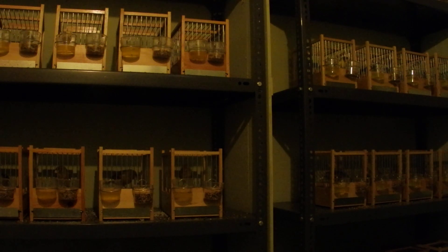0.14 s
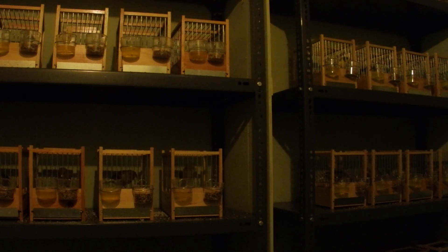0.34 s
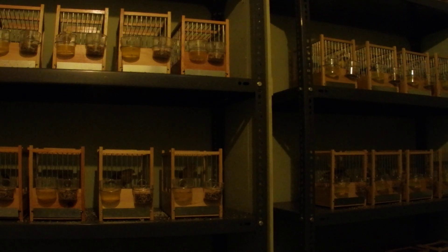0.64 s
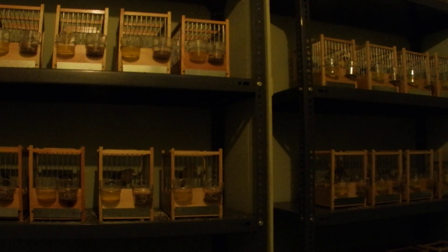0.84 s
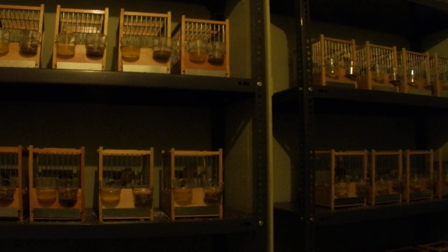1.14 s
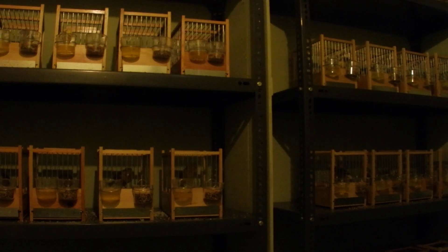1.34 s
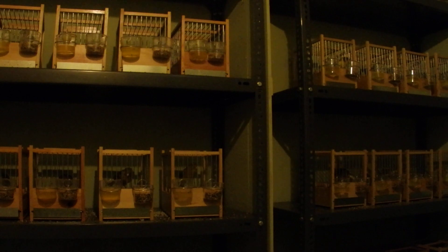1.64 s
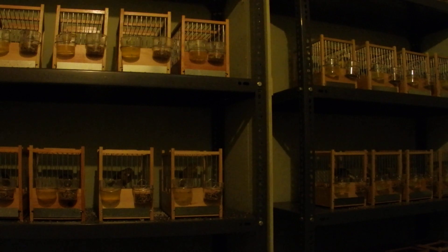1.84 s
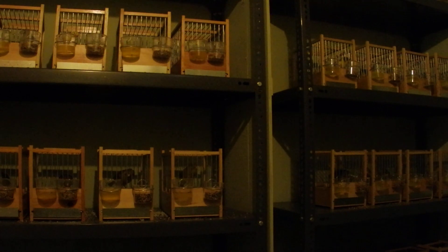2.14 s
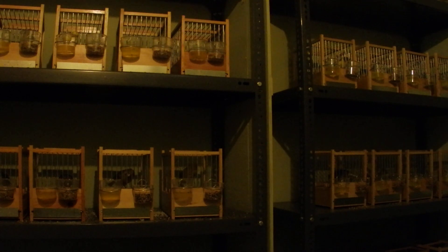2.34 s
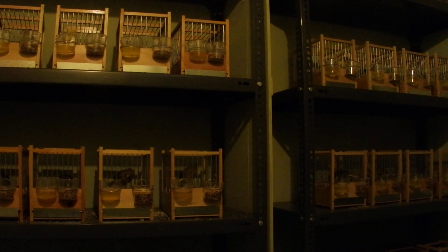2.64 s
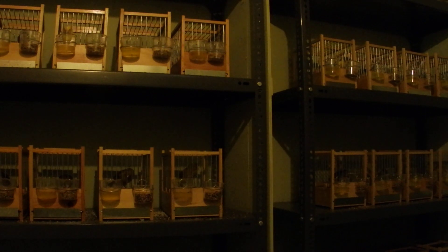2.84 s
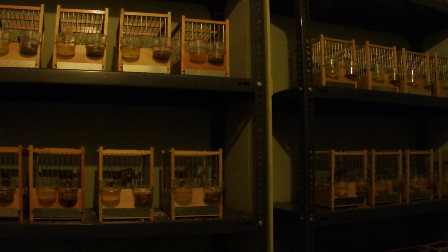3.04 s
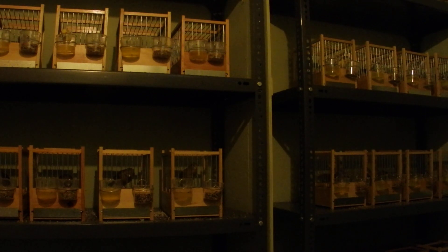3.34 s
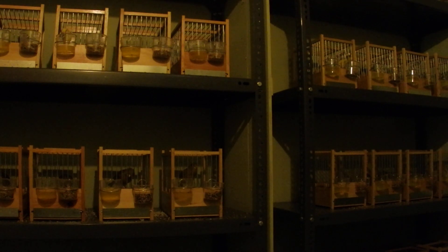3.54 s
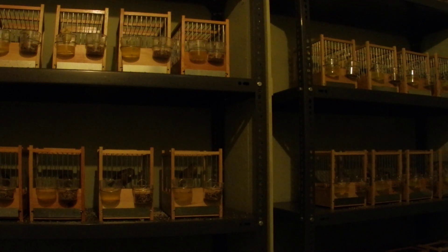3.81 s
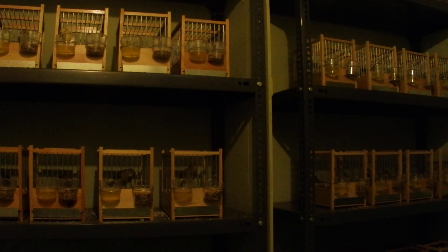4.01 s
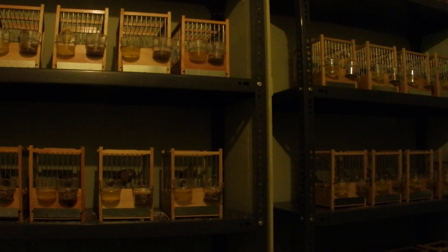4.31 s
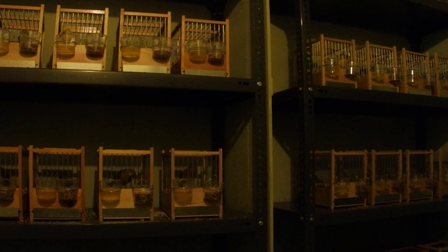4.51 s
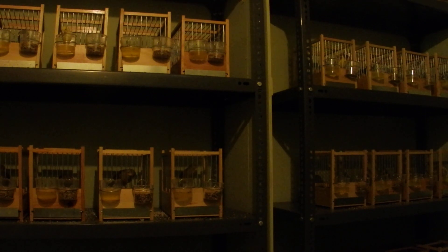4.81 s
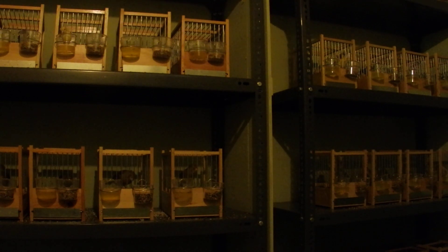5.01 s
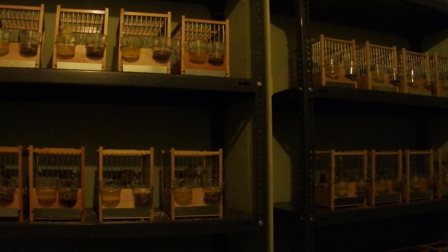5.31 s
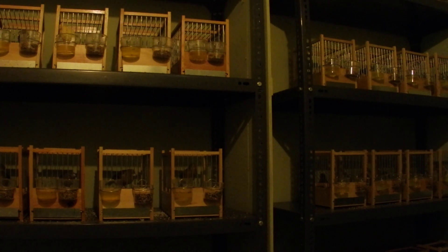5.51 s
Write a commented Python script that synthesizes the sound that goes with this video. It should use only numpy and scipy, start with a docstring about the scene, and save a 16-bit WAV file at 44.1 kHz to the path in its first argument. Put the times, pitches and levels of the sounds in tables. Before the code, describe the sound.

Several canaries sing at once from small cages in a hard-walled room. Chirps and a fast trill come first, then held whistles and sliding notes, then sharp high calls and louder overlapping trills near the end. Farther birds twitter behind, with a few faint ticks on the cages and a low, airy room hum. The notes ring briefly off the walls.

```python
"""A hard-walled bird room, where canaries sing over one another from rows of small cages.
Each syllable is a nearly pure whistle: the syrinx glides and the throat lets out only faint overtones.
Held notes, slurs, chirps and fast trills smear into ringing tails off the walls. Farther birds twitter
behind, feet and beaks tick on the cages, and the building's rumble and an airy wash lie underneath."""
import sys
import numpy as np
from scipy import signal
from scipy.fft import rfft, irfft
from scipy.io import wavfile

SR = 44100
rng = np.random.default_rng(int(sys.argv[2]) if len(sys.argv) > 2 else 0)


def master(y):
    """Save y as 16-bit WAV."""
    cut = np.clip(np.atleast_2d(y).T, -1, 1)
    pcm = np.round(cut * 32767)  # scale
    wavfile.write(sys.argv[1], SR, pcm.astype(np.int16))


N = 249606

# overtone strength against the fundamental, by where it lands: frequency_hz, level_db
OVERTONES = [(5500, -25), (7000, -32.5), (7900, -45), (9600, -41.5), (11500, -35), (14000, -34.5),
             (16000, -46.5)]
# ring time of the room: frequency_hz, t60_s
ROOM_T60 = [(500, 0.054), (2000, 0.74), (3500, 0.49), (5500, 0.37), (9000, 0.24), (15000, 0.19)]
# tone of the two noise beds: frequency_hz, level_db
RUMBLE_COLOUR = [(20, -11), (60, -7), (170, -2), (300, -6.5), (600, -9), (1100, -1.5), (2000, -40),
                 (5000, -32.5)]
WASH_COLOUR = [(600, -7), (1050, -4), (1400, 4.5), (3500, 7.5), (5000, 0), (7500, -19.5), (14000, -23.5),
               (16000, -26.5)]
# fader rides for the beds and the far chorus: time_s, level_db
RUMBLE_RIDE = [(0, -64), (.4, -54), (1, -59), (2.3, -57.5), (2.7, -63.5), (3.25, -59.5), (4, -60.5),
               (4.2, -64.5), (5.66, -64.5)]
WASH_RIDE = [(0, -44), (.6, -53), (1.6, -49), (2.2, -57), (3.3, -49.5), (4.3, -52), (5.66, -51)]
CHORUS_RIDE = [(0, -33.5), (.5, -39.5), (1, -39), (1.5, -53), (2.1, -69), (2.7, -40), (4, -35.5),
               (5.66, -43)]
# soft low notes from the back shelves: start_s, length_s, pitch_hz, level_db
COOS = [(0.048, 0.054, 1792, -38.5), (2.126, 0.054, 1952, -48.5), (2.374, .016, 1765, -40.5),
        (2.781, 0.065, 1925, -44.5), (2.861, 0.021, 1690, -39.5), (3.03, 0.046, 2153, -41),
        (3.161, .013, 1717, -35), (3.207, .021, 2220, -33.5), (4.961, 0.031, 1870, -41),
        (5.191, 0.11, 1900, -41.5), (5.29, 0.029, 1898, -34), (5.576, 0.073, 1865, -34.5)]
# rising chirps: start_s, length_s, start_pitch_hz, level_db
CHIRPS = [(.132, 0.0167, 3030, -22.5), (.26, 0.0092, 3880, -28.5), (.418, .017, 2525, -25.5),
          (.49, 0.041, 2382, -29.5), (1.9, 0.01, 3640, -27.5), (2.30, 0.011, 3770, -26),
          (2.937, 0.017, 2900, -24.5), (3.075, 0.033, 3500, -25.5), (3.238, 0.0138, 3536, -25),
          (3.752, 0.015, 3770, -32.5), (3.992, 0.016, 2793, -24.5), (4.026, 0.0091, 3760, -23.5)]
# whip-like "tsip" calls: start_s, top_pitch_hz, level_db
WHIPS = [(0.2591, 5514, -21.5), (1.506, 6980, -20.5), (1.546, 5300, -27), (1.854, 6970, -20),
         (3.833, 6440, -19), (4.031, 5910, -15.5), (4.231, 5710, -14.5), (4.427, 5980, -14.5),
         (4.614, 5900, -17.5), (4.81, 5820, -17.5), (5.057, 6130, -20.5), (5.431, 6590, -27)]
# the three steps of a "chop": delay_s, length_s, pitch_ratio, offset_db
CHOP_STEPS = [(0, .018, 1, -1), (.021, .011, .77, 0.5), (0.033, .011, .47, -10)]
# held notes: start_s, length_s, pitch_hz, glide_share, level_db
WHISTLES = [(0.488, 0.02, 5170, 0.06, -30.5), (0.6, 0.069, 4050, -.08, -28),
            (0.813, 0.052, 4060, -0.01, -26), (1.068, 0.058, 3738, 0.018, -27),
            (1.18, .055, 3900, -0.12, -30), (1.246, 0.042, 2994, -0.087, -23),
            (1.311, 0.077, 2850, -0.059, -22), (1.41, 0.047, 2787, -0.052, -26.5),
            (1.647, .1, 2790, 0.009, -21.5), (1.668, 0.25, 3700, 0.035, -31.5),
            (1.911, 0.2, 3672, -0.052, -29), (1.983, .11, 2798, 0.012, -22),
            (2.10, 0.085, 2860, -0.011, -28.5), (2.146, 0.1, 3553, 0.027, -28.5),
            (2.272, 0.079, 3790, -0.0099, -22.5), (2.389, .07, 3790, -0.0025, -30),
            (2.331, 0.099, 4790, -0.0154, -21), (2.645, 0.077, 4804, 0.0015, -19.5),
            (2.821, 0.1, 6795, -0.0064, -45.5), (2.913, 0.036, 2582, 0.044, -32),
            (2.953, .13, 3963, 0.034, -21.5), (3.205, 0.013, 3015, 0.045, -29),
            (3.416, 0.087, 2723, -0.077, -31), (3.707, 0.04, 3870, 0.063, -23),
            (3.963, 0.039, 6840, -0.03, -42.5)]
# feet and beaks on the cages: start_s, level_db
TICKS = [(.67, -42), (1.71, -37), (2.029, -39), (2.097, -41), (2.388, -44), (3.335, -42), (4.619, -39),
         (5.104, -44)]
# slow falling slurs: start_s, length_s, top_pitch_hz, level_db
SLURS = [(1.457, 0.044, 4555, -33), (1.518, 0.072, 3668, -29), (2.763, 0.076, 3896, -37),
         (4.773, 0.045, 3960, -34.5)]
# "tsee-oo" calls: break_s, whistle_length_s, whistle_pitch_hz, whistle_db, tumble_db
TUMBLES = [(2.31, 0.055, 6736, -41.5, -32), (2.501, 0.032, 5850, -34.5, -21),
           (2.624, .065, 6610, -43.5, -28.5), (3.132, 0.014, 5710, -32.5, -33),
           (3.305, 0.047, 6060, -30, -21), (3.58, 0.042, 5900, -29.5, -20.5)]

# Each trill has a BEAT, its rhythm: first_s, gap_s, count, optional slowing_s
# and, where it drifts, a COURSE: time_s, pitch_hz, level_db
FAR_BEAT, FAR_COURSE = dict(first_s=.033, gap_s=.1075, count=6), [(.03, 3423, -34), (.25, 3532, -28.5), (.57, 3515, -24)]
TWIT_BEATS, CHOP_BEATS = [dict(first_s=.065, gap_s=.106, count=4), dict(first_s=.66, gap_s=.206, count=4),
                          dict(first_s=3.965, gap_s=.21, count=2)], [dict(first_s=.3, gap_s=.042, count=3),
                                              dict(first_s=.472, gap_s=.211, count=7),
                                              dict(first_s=2.86, gap_s=.27, count=2),
                                              dict(first_s=3.68, gap_s=.102, count=13)]  # several runs each
HOOK_BEAT, HOOK_COURSE = dict(first_s=.505, gap_s=.0535, slowing_s=.00031, count=13), [(0.501, 3234, -25.5), (.6, 3395, -24.5), (0.799, 3270, -24),
                                             (1.2, 3240, -23.5)]
HOARSE_BEAT, HOARSE_COURSE = dict(first_s=.54, gap_s=.107, count=7), [(.54, 2914, -27), (.75, 2836, -33), (0.971, 2880, -28),
                                                  (1.18, 2843, -34)]
WARBLE_BEAT, WARBLE_COURSE = dict(first_s=3.715, gap_s=.106, count=7), [(3.71, 2640, -33), (3.9, 2551, -28.5), (4.14, 2476, -34),
                                                   (4.35, 2514, -33)]
BELL_BEAT, BELL_COURSE = dict(first_s=4.439, gap_s=.1036, count=12), [(4.44, 4628, -18.5), (4.75, 4660, -20), (5.271, 4720, -20.5),
                                             (5.58, 4857, -27.5)]
FLICK_BEAT, FLICK_COURSE = dict(first_s=4.535, gap_s=.1365, count=8), [(4.53, 3303, -37.5), (4.82, 3452, -34), (5.5, 3395, -32.5)]
PIP_BEAT, PIP_COURSE = dict(first_s=4.573, gap_s=.1042, count=11), [(4.57, 3747, -26), (4.9, 3715, -19.5), (5.2, 3720, -21.5),
                                          (5.42, 3822, -16), (5.61, 3940, -19.5)]
SLUR_BEAT, SLUR_COURSE = dict(first_s=4.92, gap_s=.203, count=4), [(4.9, 3510, -36), (5.53, 3610, -35.5)]
THIN_BEAT, THIN_COURSE = dict(first_s=5.16, gap_s=.197, count=3), [(5.16, 6890, -50), (5.359, 6850, -46), (5.56, 6900, -49.5)]

TOP_HZ = 15850


def amp(db):
    """Decibels to gain."""
    return 10 ** (np.asarray(db) / 20)


def curve_at(points, hz):
    """Reads a curve on a log-frequency axis."""
    frequency, value = np.transpose(points)
    return np.interp(np.log(hz + 1), np.log(frequency + 1), value)


def ride_db(ride, t):
    """Fader level at time t."""
    return np.interp(t, *np.transpose(ride))


def add(mix, s, sound):
    """Mixes a sound in at time s."""
    part = mix[max(round(s * SR), 0):][:len(sound)]
    part += sound[:len(part)]


def noise(colour, size):
    """Coloured noise of rms 1."""
    gain = amp(curve_at(colour, np.fft.rfftfreq(size, 1 / SR)))
    shaped = irfft(rfft(rng.standard_normal(size)) * gain, size)
    return shaped / np.sqrt(np.mean(shaped ** 2) + 1e-20)


def waver(t, rate_hz):
    """Smooth random wobble of rms about 1, no faster than rate_hz."""
    hz = np.geomspace(rate_hz / 10, rate_hz, num=8)[:, None]
    return np.sin(2 * np.pi * (hz * t + rng.random(hz.shape))).sum(0) / 2


def room(dry, wet_db, slaps=10):
    """Direct sound, slaps off the nearest shelves, then a grainy tail that rings longest near 2 kHz."""
    taps = rng.standard_normal(SR) * (rng.random(SR) < .03) * (np.arange(SR) / SR > .004)
    taps[(rng.uniform(.002, .035, slaps) * SR).astype(int)] += 1.8 * rng.choice([-1, 1], slaps)
    hz, t, spectrum = signal.stft(taps, SR, nperseg=256)
    decay = amp(-60 * t / curve_at(ROOM_T60, hz)[:, None])
    tail = signal.istft(spectrum * decay, SR, nperseg=256)[1]
    return dry + amp(wet_db) * signal.fftconvolve(dry, tail / np.linalg.norm(tail))[:N]


def syllable(length, start_hz, middle_hz, end_hz, db, rough, fade, bright_db):
    """The syrinx glides through three pitches; rough is pitch jitter, fade the share spent fading."""
    t = np.arange(int(max(length, .004) * SR)) / SR
    u = t / t[-1]
    arc = start_hz * (1 - u) * (1 - 2 * u) + middle_hz * 4 * u * (1 - u) + end_hz * u * (2 * u - 1)
    hz = arc * (1 + rough * waver(t, 351.7))
    phase = 2 * np.pi * np.cumsum(hz) / SR
    overtones = sum(amp(curve_at(OVERTONES, k * hz)) * (k * hz < TOP_HZ) * np.sin(k * phase)
                    for k in range(2, 5))
    swell = signal.windows.tukey(len(t), np.clip(fade, .1, 1)) * amp(db + 1.2 * waver(t, 91.2))
    rasp = .52 * rough * np.diff(rng.standard_normal(len(t) + 1))  # hoarse notes carry bright air
    return swell * (np.sin(phase) + amp(bright_db) * (overtones + rasp))


def song(rows, rough, fade, bright_db=0):
    """A run of syllables, each with its own contour; a wider beak (bright_db) frees more overtones."""
    out = np.zeros(N)
    for s, *shape in rows:
        add(out, s, syllable(*shape, rough, fade, bright_db))
    return out


def trill(rows, length, start, end, rough, fade, lag=0, bright_db=0):
    """One syllable shape repeated; start and end are ratios to each row's pitch."""
    notes = [(s + lag, length, hz * start, hz, hz * end, db) for s, hz, db in rows]
    return song(notes, rough, fade, bright_db)


def fall(rows, length, middle, end, rough, fade):
    """Steep downward sweeps; middle and end are ratios to the top pitch."""
    return song([(s, length, hz, hz * middle, hz * end, db) for s, hz, db in rows], rough, fade)


def beats(first_s, gap_s, count, slowing_s=0):
    """Start times of repeated syllables; a tiring bird slows a little."""
    k = np.arange(count)
    return first_s + gap_s * k + slowing_s * k ** 2


def repeats(beat, course, stray_share=.0041, stray_db=1):
    """A trill's rows (start_s, pitch_hz, level_db), each straying slightly from the course."""
    starts = beats(**beat)
    times, hz, db = np.transpose(course)
    pitch_stray, level_stray = rng.standard_normal((len(starts), 2)).T
    pitches = np.interp(starts, times, hz) * (1 + stray_share * pitch_stray)
    levels = np.interp(starts, times, db) + stray_db * level_stray
    return list(zip(starts, pitches, levels))


def room_tone():
    """The building's unsteady rumble under a diffuse, airy wash."""
    t = np.arange(N) / SR
    rumble = noise(RUMBLE_COLOUR, N) * amp(ride_db(RUMBLE_RIDE, t) + 3.48 * waver(t, 12))
    wash = noise(WASH_COLOUR, N) * amp(ride_db(WASH_RIDE, t))
    return rumble + wash


def far_twitter(count=260, twit_hz=5360, twit_db=-39.5):
    """The farthest birds, nearly all reverb: thin twits over a chorus of short, mostly falling glides."""
    twit_rows = [(s, twit_hz, twit_db) for beat in TWIT_BEATS for s in beats(**beat)]
    twits = trill(twit_rows, length=.018, start=.93, end=.61, rough=.039, fade=.59)
    rows = []
    for k, (when, stretch, pitch, spread, slope) in enumerate(rng.random((count, 5))):
        s = (k + when) / count * N / SR
        length = .0155 + .0297 * stretch
        hz = 2000 + 1600 * (pitch + spread)  # two draws crowd the middle of the range
        glide = .2534 * slope - .08
        rows.append((s, length, hz * (1 + glide), hz, hz * (1 - glide), ride_db(CHORUS_RIDE, s)))
    chorus = song(rows, rough=.027, fade=.52, bright_db=-.5)
    return room(amp(-12.5) * (twits + chorus), wet_db=11)


def far_notes(pip_rows):
    """Heard mostly off the walls: an even trill, low coos and a falling afternote to each pip."""
    even_trill = trill(repeats(FAR_BEAT, FAR_COURSE),
                       length=.0442, start=1.01, end=.92, rough=.0082, fade=.17)
    coo_rows = [(s, length, hz * 1.01, hz, hz * .99, db) for s, length, hz, db in COOS]
    coos = song(coo_rows, rough=.0044, fade=.17)
    afternotes = trill([(s, .72 * hz, -34) for s, hz, _ in pip_rows],
                       length=.028, start=1.2, end=.9, rough=.02, fade=.8, lag=.021)
    return room(amp(-5) * (even_trill + coos + afternotes), wet_db=3.5)


def chirps(rise=.24, climbed_by_half=.576):
    """Bright, slightly hoarse upward sweeps that ease off towards the top."""
    rows = [(s, length, hz, hz * (1 + climbed_by_half * rise), hz * (1 + rise), db)
            for s, length, hz, db in CHIRPS]
    return room(song(rows, rough=.026, fade=.52, bright_db=3), wet_db=.5)


def whips():
    """A tiny lead-in note, then the pitch leaps up and whips down."""
    leads = trill([(s, .77 * hz, db - 8) for s, hz, db in WHIPS],
                  length=.006, start=.97, end=1, rough=.01, fade=1, lag=-.006)
    sweeps = fall(WHIPS, length=.0105, middle=.8, end=.71, rough=.02, fade=1)
    return room(amp(1) * (leads + sweeps), wet_db=-4.8)


def chops(base_hz=2450, base_db=-41):
    """Back-shelf notes that drop in three steps, no two alike, creeping sharper as the song goes on."""
    starts = np.concatenate([beats(**beat) for beat in CHOP_BEATS])
    strays = rng.standard_normal((len(starts), 2))
    rows = [(s, base_hz * (.9 + .025 * s + .045 * pitch_stray), base_db + 1.2 * level_stray)
            for s, (pitch_stray, level_stray) in zip(starts, strays)]
    out = np.zeros(N)
    for lag, length, ratio, offset_db in CHOP_STEPS:
        step_rows = [(s, hz * ratio, db + offset_db) for s, hz, db in rows]
        out += trill(step_rows, length, start=1.1, end=.85, rough=.013, fade=.52, lag=lag)
    return room(amp(-2) * out, wet_db=.8)


def whistles(sag=.0083):
    """Held notes that glide gently and sag in the middle."""
    rows = [(s, length, hz * (1 - glide / 2), hz * (1 - sag), hz * (1 + glide / 2), db)
            for s, length, hz, glide, db in WHISTLES]
    return room(song(rows, rough=.0073, fade=.25), wet_db=-1.5)


def hook_trill():
    """A fast run of notes that hook upward and level off."""
    hooks = trill(repeats(HOOK_BEAT, HOOK_COURSE),
                  length=.023, start=.9, end=.99, rough=.006, fade=.34, bright_db=4.5)
    return room(amp(-.05) * hooks, wet_db=.6)


def mingled_trills():
    """Hoarse chirps under the hooks; later, bright flicks with low afternotes and two strings of slurs."""
    hoarse = trill(repeats(HOARSE_BEAT, HOARSE_COURSE),
                   length=.0205, start=.92, end=1.064, rough=.015, fade=.26)
    flick_rows = repeats(FLICK_BEAT, FLICK_COURSE)
    flicks = trill(flick_rows, length=.0254, start=.9, end=.98, rough=.0085, fade=.36, bright_db=14)
    afternotes = trill([(s, .6 * hz, db - 9.5) for s, hz, db in flick_rows],
                       length=.04, start=1.02, end=1, rough=.0043, fade=.4, lag=.057)
    slurs = trill(repeats(SLUR_BEAT, SLUR_COURSE),
                  length=.08, start=1.2, end=.92, rough=.0077, fade=.52, bright_db=6)
    thin_slurs = trill(repeats(THIN_BEAT, THIN_COURSE),
                       length=.07, start=1.06, end=.87, rough=.012, fade=.51)
    return room(hoarse + flicks + afternotes + slurs + thin_slurs, wet_db=0)


def cage_ticks(decay_s=.001, size=1024):
    """Feet and beaks make tiny dry knocks on perches and wire."""
    out = np.zeros(N)
    snap = np.exp(-np.arange(size) / SR / decay_s)
    colour = [(300, -2), (3000, 0), (8000, -5), (15000, -13)]  # frequency_hz, level_db
    for s, db in TICKS:
        add(out, s, amp(db + 3) * snap * noise(colour, size))
    return room(out, wet_db=-22)


def lone_slurs():
    """Single whistles that slide down by about a fourth."""
    rows = [(s, length, hz, hz * .87, hz * .76, db) for s, length, hz, db in SLURS]
    return room(song(rows, rough=.012, fade=.29, bright_db=2.5), wet_db=3)


def tumbles(break_hz=6300, low_fall_hz=4126, near_db=-23):
    """A sagging high whistle snaps downward, and a lower fall finishes the call."""
    out = np.zeros(N)
    for s, length, hz, whistle_db, db in TUMBLES:
        held = song([(s - length, length, hz * 1.02, hz, hz * .975, whistle_db)], rough=.014, fade=.43)
        snap = fall([(s, break_hz, db)], length=.014, middle=.86, end=.78, rough=.018, fade=.26)
        low = fall([(s + .017, low_fall_hz, db)], length=.024, middle=.92, end=.714, rough=.02, fade=.26)
        call = amp(2.5) * held + amp(-1) * (snap + low)
        direct_db = .24 * (db - near_db)  # softer calls are farther off, so less of them arrives direct
        out += room(amp(direct_db) * call, wet_db=-2 - direct_db)
    return out


def warble():
    """A low pulsing run of gently rising notes."""
    notes = trill(repeats(WARBLE_BEAT, WARBLE_COURSE),
                  length=.036, start=.985, end=1.046, rough=.0048, fade=.29)
    return room(notes, wet_db=-1.5)


def bell_trill():
    """A high, ringing run of arched notes."""
    notes = trill(repeats(BELL_BEAT, BELL_COURSE),
                  length=.03, start=.93, end=.95, rough=.0052, fade=.61, bright_db=4.5)
    return room(notes, wet_db=-1.6)


def pip_trill(pip_rows):
    """Short, clean, rounded pips from a near bird."""
    return room(trill(pip_rows, length=.018, start=.91, end=.96, rough=.0035, fade=.87), wet_db=-3)


def scene():
    """A mono mix; each group of birds arrives by its own paths through the room."""
    pip_rows = repeats(PIP_BEAT, PIP_COURSE)
    calls = whistles() + lone_slurs() + chirps() + tumbles() + whips()
    trills = hook_trill() + mingled_trills() + warble() + bell_trill() + pip_trill(pip_rows)
    background = far_twitter() + far_notes(pip_rows) + chops()
    return (calls + trills + background + cage_ticks() + room_tone())[None]


def record(dry):
    """A steep low-pass takes off the very top."""
    low_pass = signal.firwin(511, TOP_HZ, window=("kaiser", 9), fs=SR)
    return signal.oaconvolve(dry, low_pass[None], "same")


dry = scene()
out = record(dry)
master(out)
```